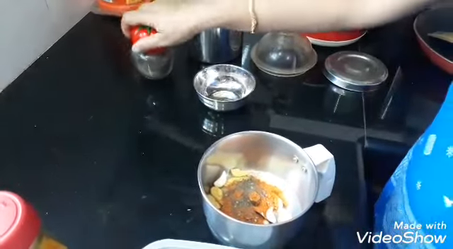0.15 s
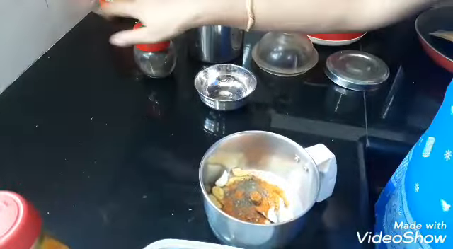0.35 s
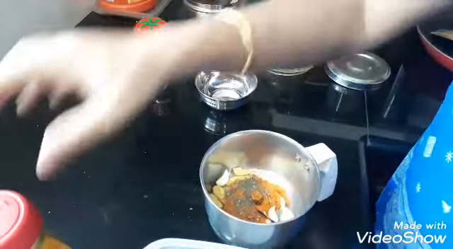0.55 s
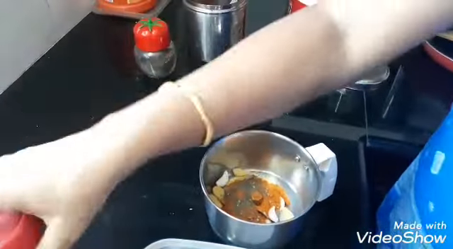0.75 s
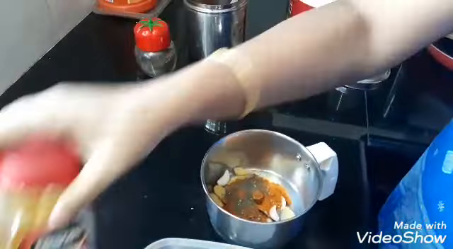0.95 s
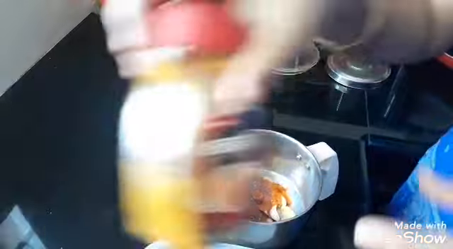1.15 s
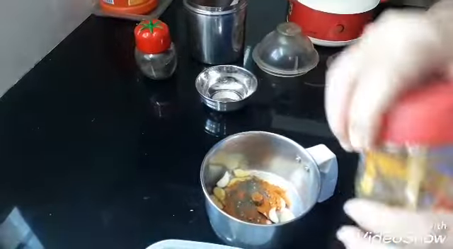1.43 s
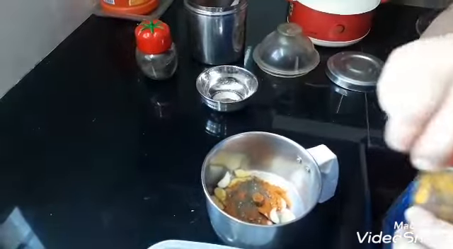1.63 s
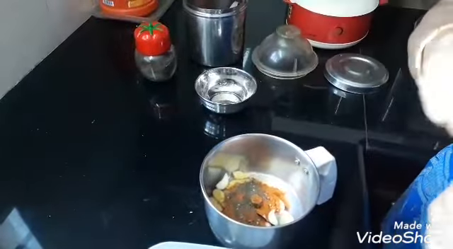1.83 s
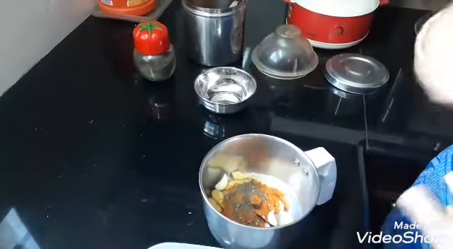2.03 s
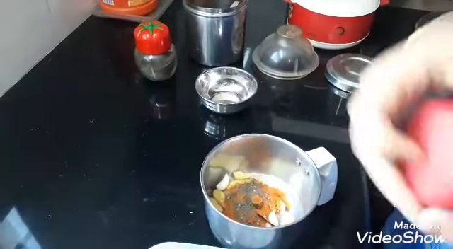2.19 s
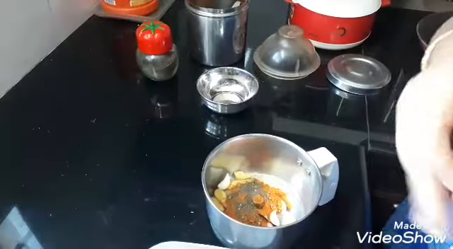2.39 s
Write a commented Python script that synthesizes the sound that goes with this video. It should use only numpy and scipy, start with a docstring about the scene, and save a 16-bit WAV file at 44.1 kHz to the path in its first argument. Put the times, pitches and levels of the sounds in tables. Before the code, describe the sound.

Close, nearly mono pickup in a small, echoing kitchen: a hard glass clack with ringing counter and softer bumps, then lighter jar knocks, bright bangle clinks, a grainy lid twist and a final hollow plastic click.

```python
"""A glass spice jar is set down hard on a stone countertop in a small, bare kitchen: swelling modes clack,
walls echo, the counter rings, and the jar then rocks with duller bumps. A second jar knocks as damped modes;
a metal bangle jingles as clusters of beating modes; a plastic lid rubs as random slips and filtered noise,
then clicks. Coloured room noise and a hum lie underneath; the sound is almost mono."""
import sys
import numpy as np
from scipy import signal
from scipy.fft import rfft, irfft
from scipy.io import wavfile

SR = 44100
rng = np.random.default_rng(int(sys.argv[2]) if len(sys.argv) > 2 else 0)


def dump(signal):
    """Clip the signal to [-1, 1] and save it as 16-bit WAV at the path in sys.argv[1]."""
    limited = np.clip(np.atleast_2d(signal).T, -1, 1)
    pcm = np.round(limited * 32767).astype(np.int16)
    wavfile.write(sys.argv[1], SR, pcm)


N = 112454
T = np.arange(N) / SR  # s
HZ = np.maximum(np.arange(N // 2 + 1) * SR / N, 1)  # spectral bins, kept above zero for the logarithm

# Spectrum of the bright tick shared by bangle and lid: [f/Hz, relative density/dB per Hz]
TICK_SPECTRUM = [(500, -2.5), (2700, 1), (4200, -9), (6000, 2.5), (7800, -6.5), (10000, -0.5), (13000, -7),
                 (16000, -13)]
SOFT_RISE_S = 0.00043  # time constant of the onset of the counter, the room wash and the lid tick
TICK_T60_S = 0.05  # ticks of the knocks and the lid


def from_db(db):
    """Amplitude gain is the antilogarithm of level/20."""
    return 10 ** (np.asarray(db) / 20)


def rms_one(x):
    """Mean power is normalised to one."""
    return x / np.sqrt(np.mean(x ** 2) + 1e-20)


def at_hz(points, hz):
    """Interpolation is linear along a logarithmic frequency axis."""
    f, v = np.transpose(points)
    return np.interp(np.log(hz), np.log(f), v)


def colour(x, spectrum):
    """Linear filtering multiplies the spectrum by a gain; the result has unit rms."""
    gain = from_db(at_hz(spectrum, HZ))
    return rms_one(irfft(rfft(x) * gain, N))


def noise(spectrum):
    """Filtered white noise becomes coloured noise of unit rms."""
    return colour(rng.standard_normal(N), spectrum)


def decay(t60):
    """Linear damping gives an exponential envelope that loses 60 dB in t60."""
    return np.exp(-np.minimum(np.log(1000) * T / t60, 60))


def onset(time_constant):
    """A first-order build-up approaches its final value exponentially."""
    return 1 - np.exp(-T / time_constant)


def ring(hz, db, t60):
    """A struck mode is an exponentially damped sinusoid."""
    return from_db(db) * np.sin(2 * np.pi * hz * T) * decay(t60)


def swelling(modes):
    """Heavily damped modes swell for a few cycles, peak at the rise time and die at once."""
    total = 0
    for hz, db, rise in modes:
        envelope = (T / rise * np.exp(np.maximum(1 - T / rise, -30))) ** 4
        total = total + from_db(db) * np.sin(2 * np.pi * hz * T) * envelope
    return total


def low_passed(x, cutoff_hz):
    """A second-order low-pass dulls a contact."""
    return signal.sosfilt(signal.butter(2, cutoff_hz, fs=SR, output="sos"), x)


def delayed(x, s):
    """A pure delay shifts the sound s seconds later."""
    return np.concatenate([np.zeros(max(int(s * SR), 0)), x])[:N]


def dying(x):
    """Absorption depends on frequency, so each octave of a noise decays at its own rate."""
    # Reverberation of the kitchen: [f/Hz, t60/s]
    room_t60 = [(150, 1), (450, 0.52), (1000, 0.57), (2300, 0.3), (4000, 0.42), (12000, 0.28)]
    spectrum = rfft(x)
    centres = 125 * 2. ** np.arange(8)
    total = 0
    for hz, share in zip(centres, np.eye(len(centres))):
        octave_gain = np.interp(np.log(HZ), np.log(centres), share)  # overlapping triangles that sum to one
        total = total + irfft(spectrum * octave_gain, N) * decay(at_hz(room_t60, hz))
    return total * onset(SOFT_RISE_S)


def in_kitchen(x, room_db):
    """Direct sound adds to its convolution with a diffuse tail, which builds as the walls answer."""
    tail = dying(rng.standard_normal(N)) * onset(0.004)
    tail = tail / np.sqrt(np.sum(tail ** 2))  # unit energy
    return x + from_db(room_db) * signal.fftconvolve(x, tail)[:N]


def background():
    """Stationary noise and tones are common to both channels; a very faint hiss is opposite in the two."""
    # Room noise: [f/Hz, relative density/dB per Hz]
    room_spectrum = [(30, -31), (70, -12.5), (130, -12), (180, 1.5), (260, -5.5), (500, -5.5), (1000, -16),
                     (2500, -17), (4400, -26.5), (6000, -25.5), (7900, -37), (9000, -26), (15500, -41)]
    # Steady hum tones: [f/Hz, rms level/dB]
    hum_tones = [(100, -64.5), (167, -70)]
    room_db, side_db = -52, -69.5  # rms; the hiss is white until the top is cut
    hum = 0
    for hz, db in hum_tones:
        hum = hum + np.sqrt(2) * from_db(db) * np.sin(2 * np.pi * (hz * T + rng.random()))
    side = from_db(side_db) * rng.standard_normal(N) * np.array([[1], [-1]])
    return from_db(room_db) * noise(room_spectrum) + hum + side


def lid_twist():
    """Stick-slip friction of plastic on the thread makes a grainy rasp in two strokes, with a hiss."""
    # Rubbing strokes: [t/s, rasp level/dB, hiss level/dB]
    strokes = [(1.775, -62, -65), (1.806, -45, -45.5), (1.84, -46.5, -52), (1.88, -55.5, -66),
               (1.92, -53.5, -54), (1.95, -56.5, -53), (2.019, -43.5, -48.5), (2.064, -71, -61)]
    # Moments when the thread catches: [t/s, rasp level/dB]
    catches = [(1.856, -59), (1.913, -49.5), (1.927, -51), (1.98, -47), (2.284, -46.5)]
    # Rasp: [f/Hz, relative density/dB per Hz]
    rasp_spectrum = [(200, 7), (1100, -6.5), (1600, 3), (2600, 3.5), (4000, -12.5), (9000, -25)]
    # Hiss: [f/Hz, relative density/dB per Hz]
    hiss_spectrum = [(3000, -20), (5700, 7), (7500, -4), (9200, 8.5), (10800, 0.5), (15000, -20)]
    slips_per_s, spread_db, catch_s = 1100, 2.5, 0.0051
    is_slip = rng.random(N) < slips_per_s / SR
    slip_gain = from_db(spread_db * np.minimum(rng.exponential(1, N), 4))
    slips = is_slip * rng.choice([-1, 1], N) * slip_gain
    s, rasp_db, hiss_db = np.transpose(strokes)
    rasp = from_db(np.interp(T, s, rasp_db, left=-np.inf, right=-np.inf))  # silent outside the strokes
    hiss = from_db(np.interp(T, s, hiss_db, left=-np.inf, right=-np.inf))
    for at, db in catches:
        rasp = rasp + from_db(db) * np.exp(-np.minimum(((T - at) / catch_s) ** 2, 20))
    return rasp * colour(slips, rasp_spectrum) + hiss * noise(hiss_spectrum)


def lid_click():
    """The hollow lid answers a short excitation with damped modes and a bright noise tick."""
    # Modes of the lid: [f/Hz, level/dB, time to peak/s]
    lid_modes = [(1563, -22, 0.0025), (2070, -33.5, 0.0053), (6000, -46, 0.0036)]
    click_s, tick_db, room_db, dull_hz = 2.4563, -33.5, -9, 10800
    tick = from_db(tick_db) * noise(TICK_SPECTRUM) * decay(TICK_T60_S) * onset(SOFT_RISE_S)
    click = swelling(lid_modes) + low_passed(tick, dull_hz)
    return in_kitchen(delayed(click, click_s), room_db)


def cluster(hz, spread_hz, db, count=8):
    """Close modes struck together beat, so the ring is rough and differs with every clink."""
    t60 = 0.035  # s
    frequencies = hz + spread_hz * rng.uniform(-1.01, 1, count)
    modes = sum(rng.choice([-1, 1]) * ring(f, db, t60) for f in frequencies)
    one_mode_energy = np.sum(ring(hz, db, t60) ** 2)
    return modes * np.sqrt(one_mode_energy / np.sum(modes ** 2))


def bangle():
    """Each clink convolves modal clusters with one touch and a brief, weakening chatter."""
    # Clinks: [t/s, ring level/dB, lowest-cluster level/dB, tick level/dB]
    clinks = [(0.934, -48, -55, -70), (0.979, -47.5, -53, -72), (1.071, -50.5, -54, -75),
              (1.513, -50, -47.5, -49), (1.538, -41.5, -41, -51), (1.545, -40.5, -49, -56),
              (1.5543, -41, -55, -52), (1.564, -40, -50, -48.5), (1.5965, -41, -45, -49),
              (1.618, -33, -38, -40.5), (1.639, -30, -31.5, -37), (1.6461, -28, -41, -38),
              (2.078, -36.5, -50, -45), (2.122, -47, -57, -49), (2.179, -35.5, -65, -47.5),
              (2.216, -45, -62, -58)]
    # Clusters of close modes: [centre f/Hz, half spread/Hz, relative level/dB]
    clusters = [(2934, 360, 0), (5590, 300, -0.5), (9550, 626, -10.5), (12840, 320, -15)]
    chatter_s, chatter_per_s, chatter_db = 0.012, 600, -11
    tick_t60_s = 0.051
    out = np.zeros(N)
    for s, db, low_db, tick_db in clinks:
        metal = 0
        for k, (hz, spread_hz, mode_db) in enumerate(clusters):
            metal = metal + cluster(hz, spread_hz, (db if k else low_db) + mode_db)
        touches = (rng.random(N) < chatter_per_s / SR) * rng.choice([-1, 1], N)
        touches = touches * from_db(chatter_db) * np.maximum(1 - T / chatter_s, 0)
        touches[0] = 1  # the first touch
        touches = touches / np.sqrt(np.sum(touches ** 2))  # unit energy
        metal = signal.fftconvolve(metal, touches)[:N]
        tick = from_db(tick_db) * noise(TICK_SPECTRUM) * decay(tick_t60_s)
        out += delayed(metal + tick, s)
    return out


def thuds():
    """Soft low bumps of the jar, on the counter and then in the hand, are single damped modes."""
    # Thuds: [t/s, level/dB, f/Hz, t60/s, relative room level/dB]
    soft_bumps = [(0.9799, -28, 484, 0.027, -2), (2.0041, -26.5, 211, 0.15, -14),
                  (2.025, -33.5, 272, 0.059, -16), (2.05, -28, 331, 0.049, -12)]
    out = np.zeros(N)
    for s, db, hz, t60, room_db in soft_bumps:
        out += in_kitchen(delayed(ring(hz, db, t60), s), room_db)
    return out


def jar_knocks():
    """The hand damps the second jar's modes: pitch and colour follow the grip, drier once held close."""
    # Knocks: [t/s, level/dB, pitch f/Hz, overtone shift/dB, undertone shift/dB, tick level/dB,
    # relative room level/dB]
    knocks = [(0.8853, -36, 1690, -6.5, -19, -34.5, -4.5), (0.9705, -28.5, 1673, -24, -4.5, -34, -5.5),
              (2.0054, -32.5, 1440, -10, -2, -36.5, -12), (2.0428, -29.5, 1440, -9.5, -1.5, -38.5, -12.5)]
    # Modes of the jar: [ratio to the pitch, relative level/dB, t60/s]
    jar_modes = [(0.519, 1.5, 0.031), (.77, 1.5, 0.017), (1, 0.5, 0.025), (1.32, 0.5, 0.023),
                 (1.78, -13, 0.042)]
    # Noisy tick of contact: [f/Hz, relative density/dB per Hz]
    contact_spectrum = [(300, -7), (1000, 7.5), (1700, 10.5), (3000, -3.5), (4200, -23), (6000, -9.5),
                        (11000, -52)]
    rise_s = 0.00024  # time constant
    out = np.zeros(N)
    for s, db, hz, over_db, under_db, tick_db, room_db in knocks:
        body = 0
        for k, (ratio, mode_db, t60) in enumerate(jar_modes):
            tone_db = over_db * (k > 2) + under_db * (k < 2)  # mode 2 is the pitch itself
            body = body + ring(hz * ratio, db + mode_db + tone_db, t60)
        tick = from_db(tick_db) * noise(contact_spectrum) * decay(TICK_T60_S)
        out += in_kitchen(delayed((body + tick) * onset(rise_s), s), room_db)
    return out


def glass_jar():
    """Impact excites damped clack modes, early reflections, counter modes and reverberation."""
    # The landing, then the rocking touches: [t/s, relative level/dB]
    landings = [(0.2279, 0), (0.3535, -14), (0.3595, -12.5), (0.429, -23)]
    # Clack of glass on stone: [f/Hz, level/dB, time to peak/s]
    clack_modes = [(347, -22.5, 0.0018), (1007, -18, 0.0018), (2016, -19.5, 0.003), (2395, -5.5, 0.0013),
                   (3190, -25, 0.0033), (6150, -35.5, 0.0022)]
    # Counter and the things on it: [f/Hz, level/dB, t60/s]
    counter_modes = [(267.8, -33, 0.59), (372, -31.5, 0.38), (491, -35.5, 0.48), (868, -30.5, 0.34),
                     (1783, -31, 0.38), (2090, -32.5, 0.57), (2163, -29, 0.49), (2254, -35.5, 0.55),
                     (2404, -37, 0.22), (2534, -46, 0.12)]
    # Reflections from the nearest walls: [delay t/s, relative level/dB]
    wall_echoes = [(.0058, -11), (.0118, -12), (.0192, -13), (.0274, -14), (.0316, -14)]
    # Wash of room sound: [f/Hz, relative density/dB per Hz]
    wash_spectrum = [(110, -32), (180, -7.5), (260, -3.5), (600, -11.5), (950, -4.5), (1400, -4.5),
                     (2300, 5.5), (3100, -10.5), (4600, -28.5), (6300, -31.5), (14000, -50.5)]
    wash_db = -19  # before its decay
    rock_dull_hz, rock_ring_db = 1600, -5  # rocking is softer and stirs the counter less
    clack = swelling(clack_modes)
    blow = clack + sum(from_db(db) * delayed(clack, s) for s, db in wall_echoes)
    counter = sum(rng.choice([-1, 1]) * ring(*mode) for mode in counter_modes)
    tail = counter * onset(SOFT_RISE_S) + from_db(wash_db) * dying(noise(wash_spectrum))
    hard = blow + tail
    soft = low_passed(blow + from_db(rock_ring_db) * tail, rock_dull_hz)
    out = np.zeros(N)
    for k, (s, db) in enumerate(landings):
        out += from_db(db) * delayed(soft if k else hard, s)
    return out


def scene():
    """Superposition puts all the handling at the centre; small objects radiate little bass."""
    handling = jar_knocks() + thuds() + lid_click()
    handling = handling + in_kitchen(bangle(), -7) + in_kitchen(lid_twist(), -7.5)  # relative room level, dB
    bass_edge_hz = 216
    thin = signal.butter(4, bass_edge_hz, "high", fs=SR, output="sos")
    return signal.sosfilt(thin, glass_jar() + handling) + background()


def record(dry):
    """An elliptic low-pass cuts the top steeply."""
    cutoff_hz = 15900
    steep = signal.ellip(10, .1, 80, cutoff_hz, fs=SR, output="sos")  # 0.1 dB ripple, 80 dB rejection
    return signal.sosfilt(steep, dry)


dry = scene()
out = record(dry)
dump(out)
```